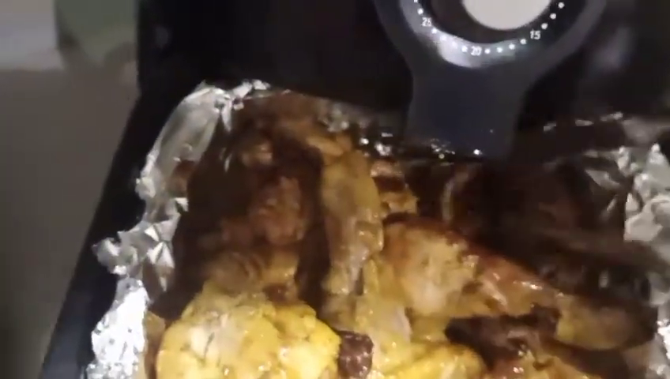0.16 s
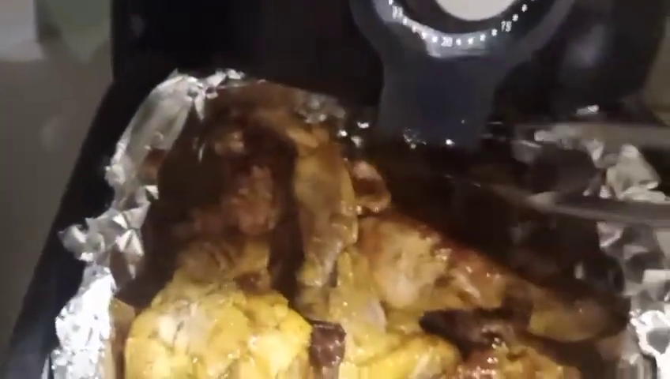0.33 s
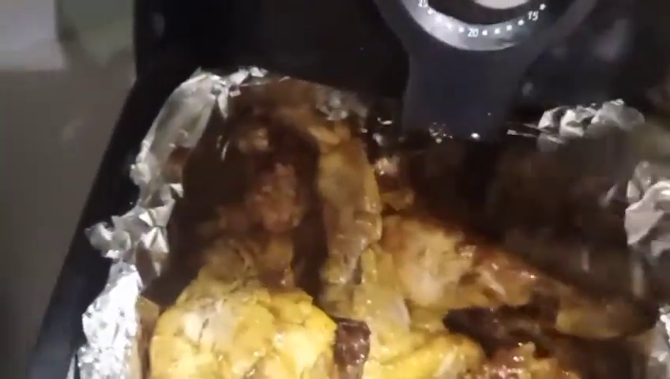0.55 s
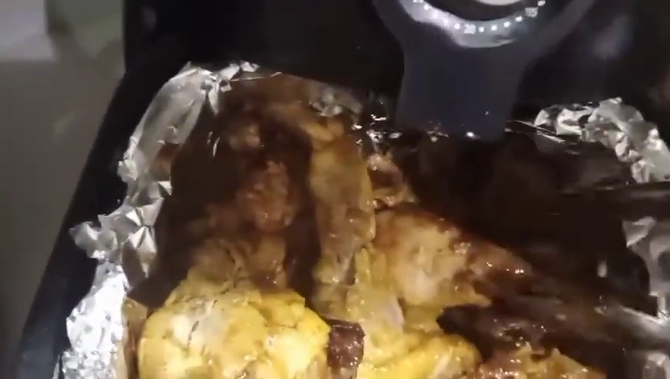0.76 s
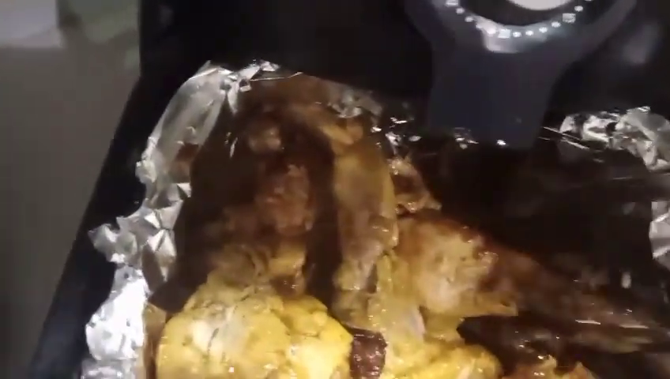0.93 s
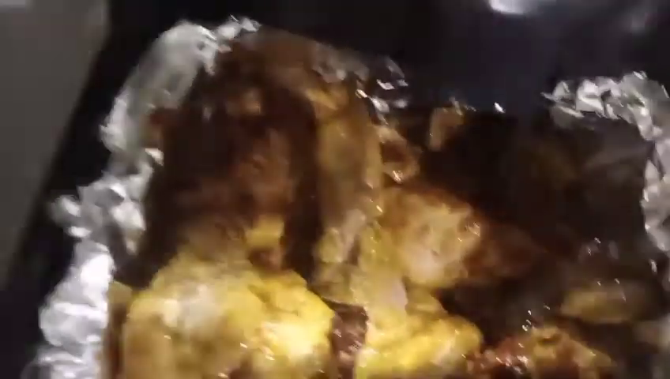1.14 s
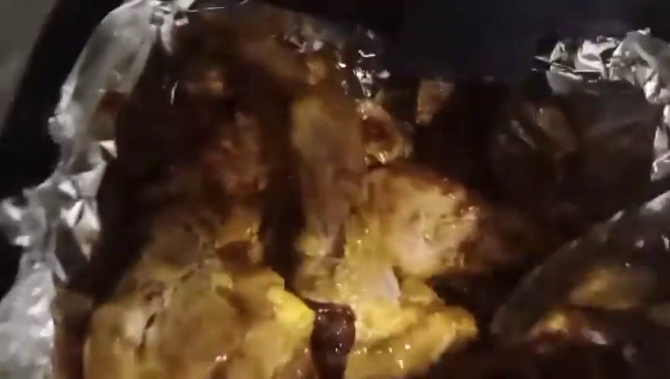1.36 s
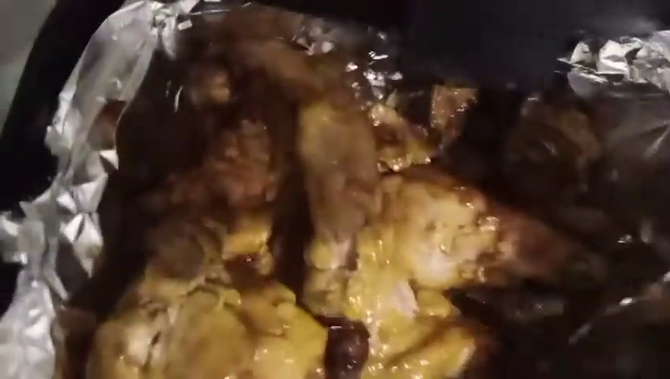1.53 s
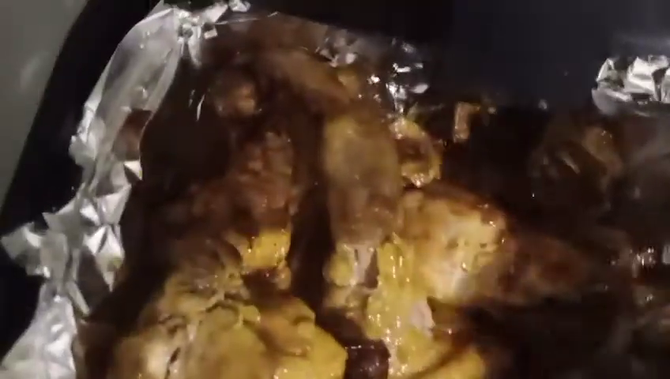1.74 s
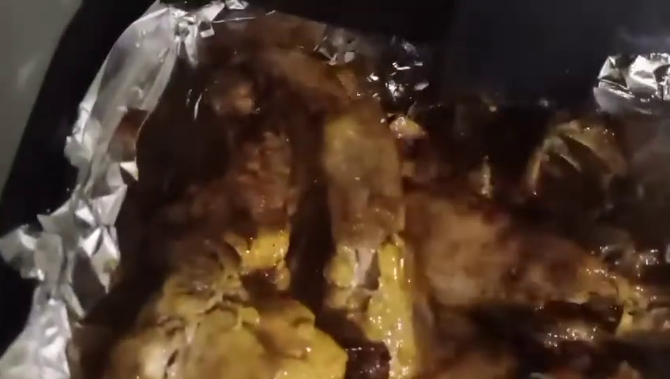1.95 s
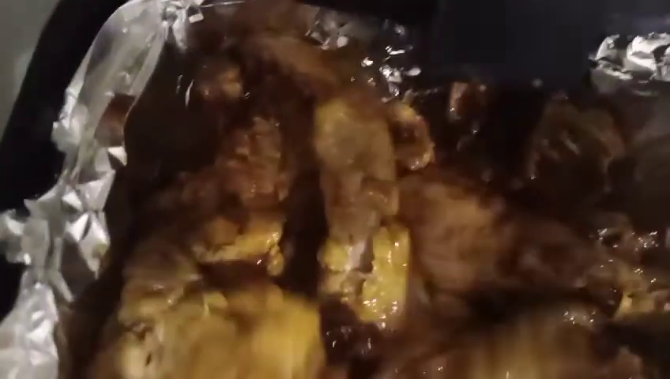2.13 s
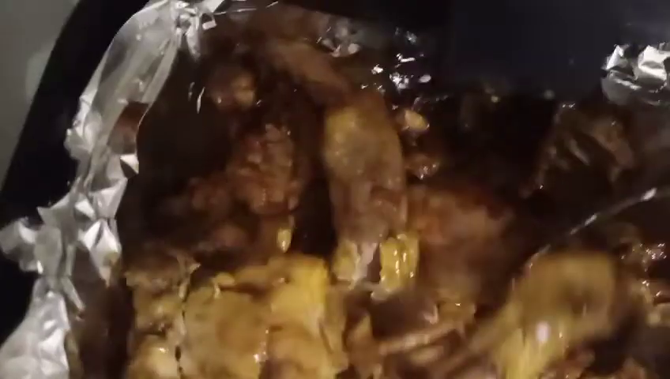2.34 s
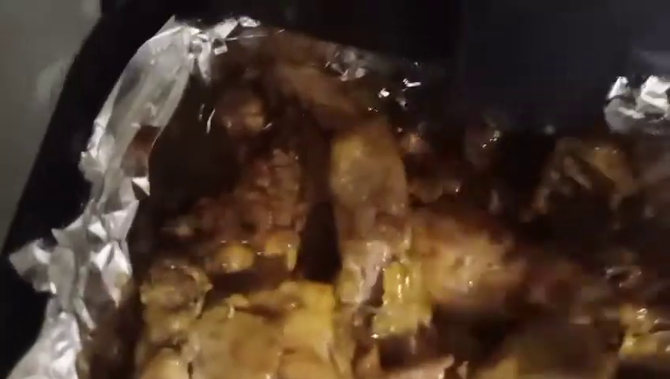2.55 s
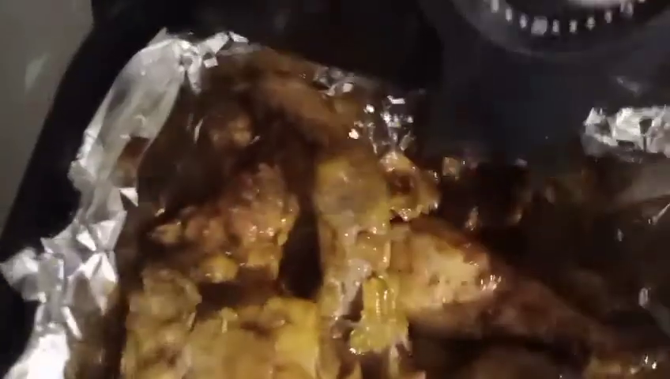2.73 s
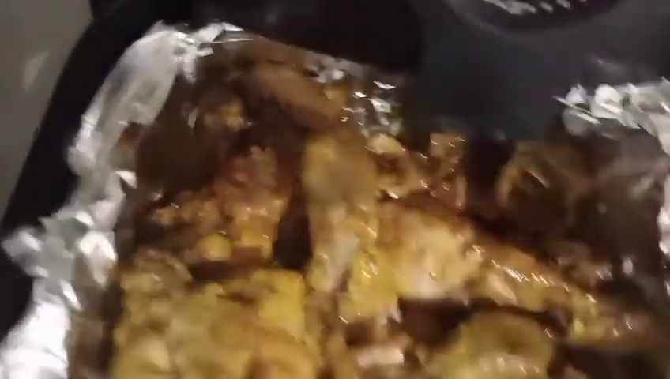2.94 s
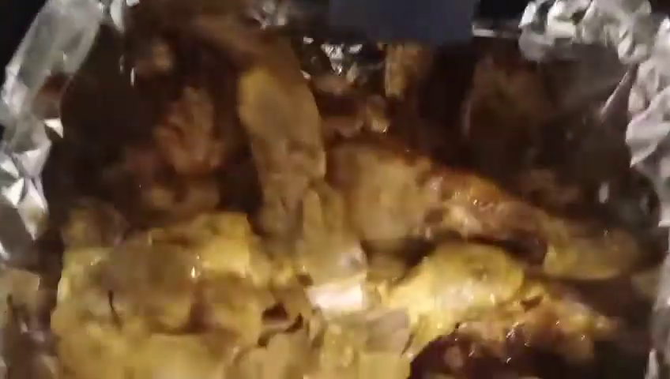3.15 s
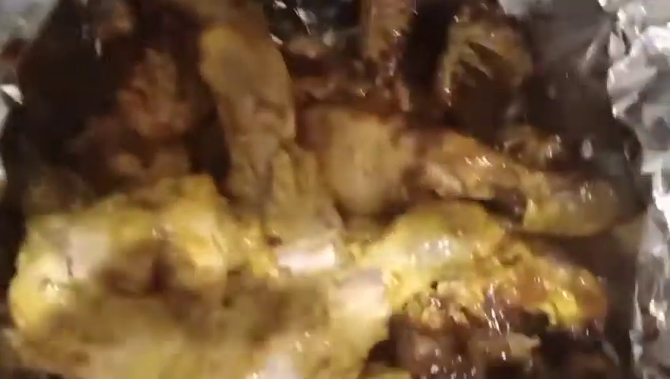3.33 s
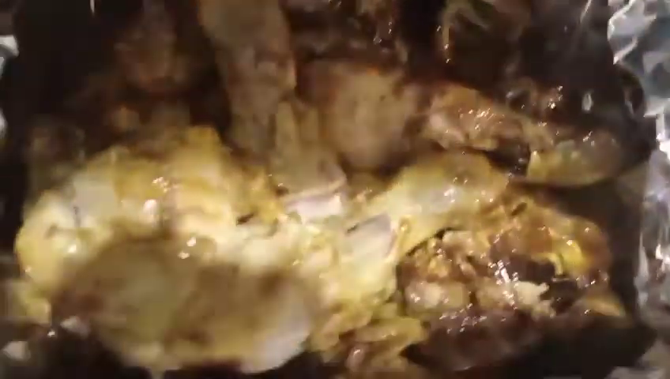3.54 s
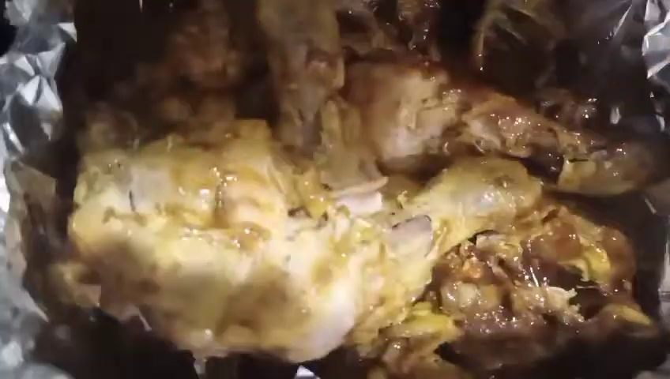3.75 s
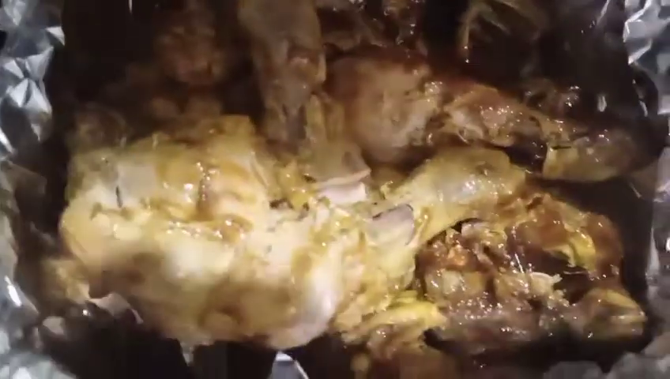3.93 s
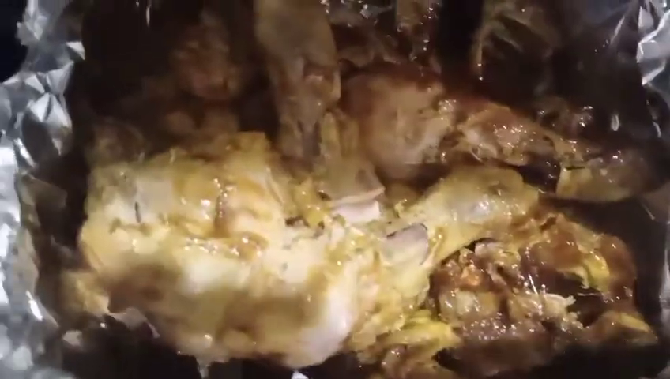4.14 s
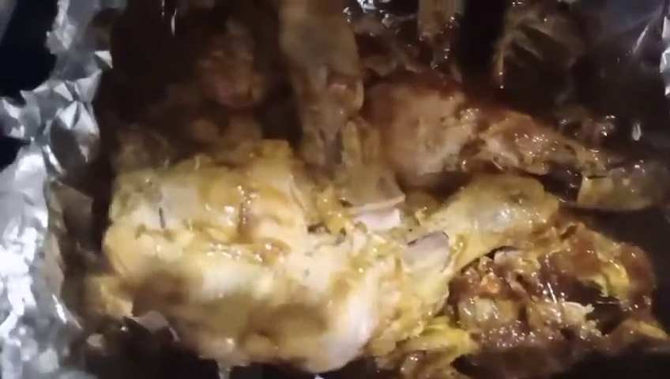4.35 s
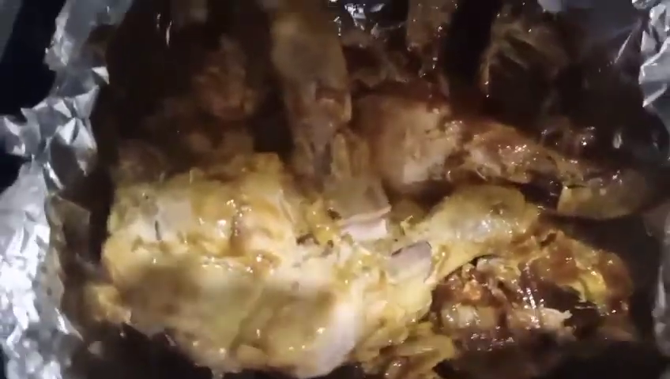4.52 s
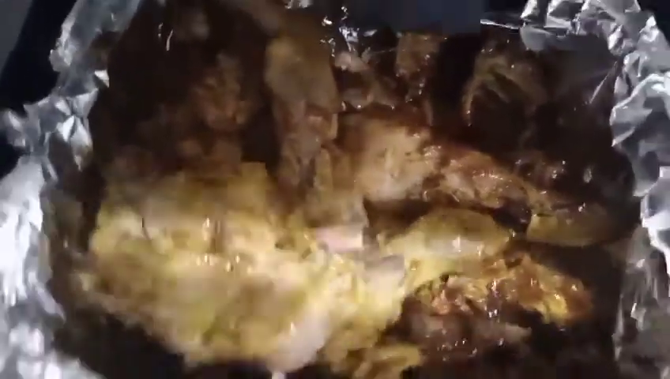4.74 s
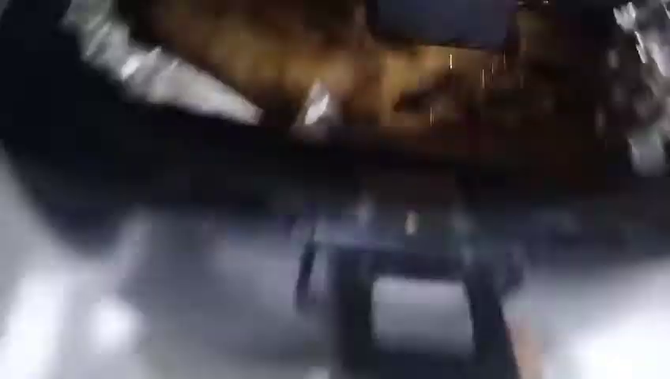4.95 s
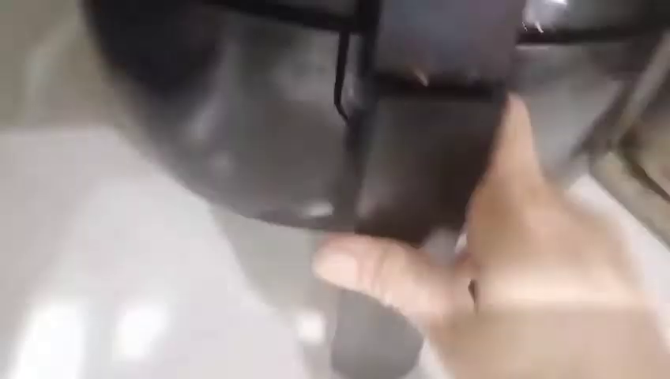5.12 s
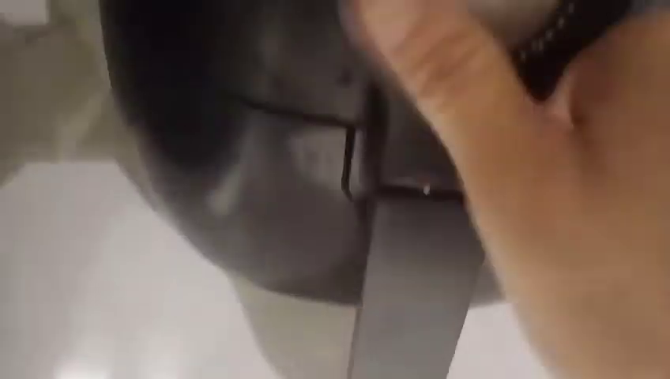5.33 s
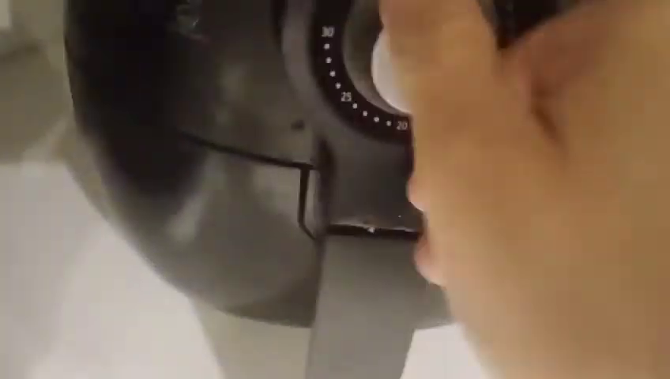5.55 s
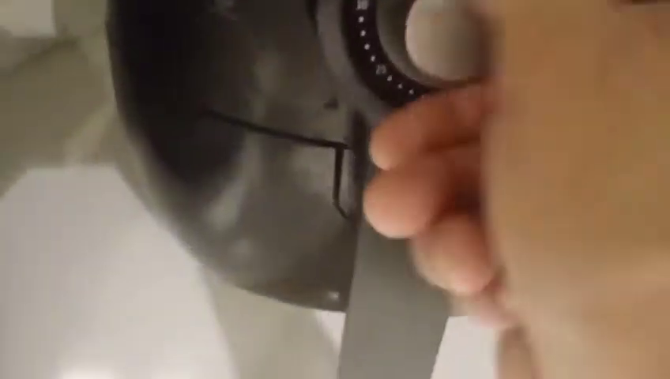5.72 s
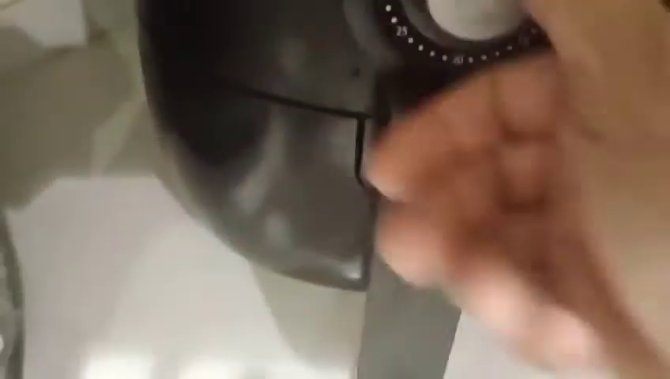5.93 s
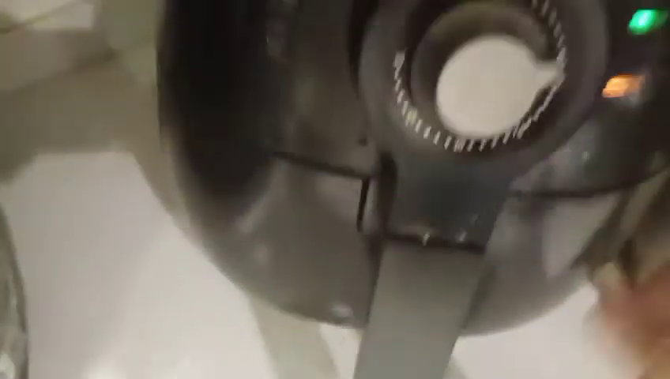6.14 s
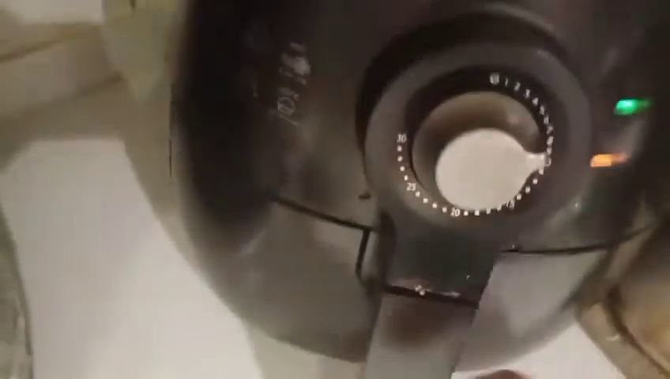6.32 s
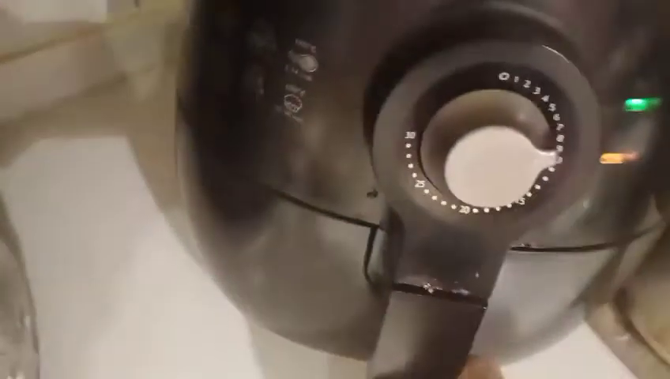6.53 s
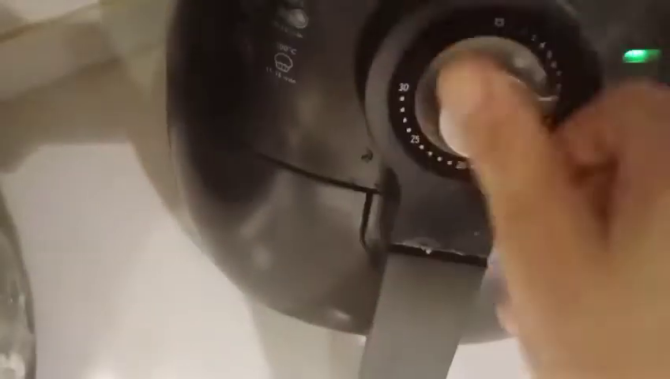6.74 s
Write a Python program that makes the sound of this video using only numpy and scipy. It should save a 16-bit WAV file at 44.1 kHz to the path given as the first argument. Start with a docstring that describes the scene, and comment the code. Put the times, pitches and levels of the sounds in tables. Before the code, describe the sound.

Foil crackles over faintly sizzling chicken, metal tongs click and clatter down, a basket scrapes and thumps shut, a dial ratchets and a fan spins up.

```python
"""Chicken sizzles faintly (bursts of tiny clicks, a jet of hissing noise at first) in an air fryer's basket.
Tongs turn it over the grate and crumple the foil lining: sharp noise cracks and runs of small slips.
The tongs click, then clatter down on the counter, ringing in decaying modes. The basket scrapes, drums and
knocks into its plastic housing and thumps its stop. The timer dial catches and its teeth rattle past.
The fan hums and whines, its throb and rush of air gathering speed; low room noise lies under it all."""
import sys
import numpy as np
from scipy import signal
from scipy.fft import rfft
from scipy.io import wavfile
from scipy.ndimage import uniform_filter1d

SR = 44100
rng = np.random.default_rng(int(sys.argv[2]) if len(sys.argv) > 2 else 0)


def transcribe(signal):
    """Save signal, clipped to [-1, 1], as a 16-bit WAV file at the path in sys.argv[1]."""
    frames = np.atleast_2d(signal).T
    limited = np.clip(frames, -1, 1)
    pcm = np.round(limited * 32767).astype(np.int16)
    wavfile.write(sys.argv[1], SR, pcm)


N = 303408
TIME = np.arange(N) / SR


# In event tables, level is that of the treble; weight is low and mid against treble. foil creases snapping,
# plus one knock of the tongs on the basket at 3.16 s: (time [s], level [dB], weight [dB])
FOIL_SNAPS = [(.0165, -34.5, -34), (.0549, -24.5, -7), (.249, -24, -12.5), (.2941, -18, -7.5),
              (.3319, -26, -7), (.4831, -34, -8), (.8135, -22, -10), (.8193, -34, -19), (.8261, -23.5, -5),
              (.8435, -31, -2), (.8833, -23, -1.5), (.9008, -28.5, -1.5), (.9391, -31.5, -15.5),
              (1.2112, -33, -11.5), (1.215, -25, -31), (1.2604, -20.5, -26.5), (1.4441, -24.5, -15),
              (1.5127, -28.5, -5.5), (1.5395, -31.5, -3), (1.7071, -31.5, -18), (1.7227, -17, -4),
              (1.8792, -23, -5), (2.196, -34, -11), (2.2953, -42, -1), (2.5809, -22, -13),
              (2.5914, -22, -6.5), (2.704, -40.5, -38), (3.1618, -37.5, -1.5), (4.8591, -27, -35)]
# tongs and meat dragging on the foil: (start [s], end [s], level [dB], weight [dB])
FOIL_DRAGS = [(0, .061, -44, -5.5), (.07, .15, -54, -11), (.241, .3, -41.5, -9), (.303, .36, -35, -1.5),
              (.365, .405, -40, -5.5), (.413, .527, -51.5, -6), (.813, .855, -35, -6.5), (.86, .92, -45, 1),
              (.96, 1.03, -47.5, -13.5), (1.21, 1.255, -42, -6), (1.28, 1.363, -50, -10),
              (1.38, 1.44, -45, -10), (1.45, 1.494, -39, -10), (1.525, 1.56, -44.5, -1),
              (1.64, 1.74, -56.5, -6), (1.839, 1.89, -35.5, -6.5), (2.103, 2.135, -45, -51),
              (2.156, 2.365, -54.5, -5), (2.535, 2.562, -42, -12), (2.566, 2.6, -34, -9),
              (2.82, 2.852, -51, -12.5), (3.173, 3.28, -46, -11)]
# resonances of the foil-lined bowl: (frequency [Hz], width [Hz], lift [dB])
BOWL_PEAKS = [(291, 15.4, 18), (463, 78, 11), (873, 30, 3.5), (950, 30, 9.5), (1325, 29, 10),
              (1560, 260, 5.5), (1800, 83, 2.5), (2450, 50, -2), (4030, 270, -2.5), (5370, 39, 1),
              (6840, 440, 0.5)]
# steel skidding on the basket wall: (start [s], end [s], level [dB])
WALL_SKIDS = [(2.437, 2.504, -52.5), (2.504, 2.603, -60), (2.62, 2.685, -76), (4.72, 4.742, -62.5)]
# resonances of the wall: (frequency [Hz], width [Hz], lift [dB])
WALL_PEAKS = [(1140, 260, 20), (1530, 170, 25.5), (2030, 330, 13.5), (2390, 210, 21), (3480, 1700, 12.5)]
SKID_WEIGHT_DB = 19


def foil():
    """Creases snap through; tongs drag across the foil and skid on the wall; it rustles as it settles."""
    snaps = blows(FOIL_SNAPS, BOWL_PEAKS, low_db=-9, air_db=0.0, ripple_db=2.0,
                  rise_s=0.0011, decay_s=0.0037, blunting=0.3, after_db=-25.5, after_s=0.029)
    slips = crinkled(grains(per_s=4100, spread_db=3.3), per_s=70, lift=0.62, decay_s=0.014)
    drags = rubbing(FOIL_DRAGS, BOWL_PEAKS, slips, low_db=-10, air_db=-1.5, ripple_db=5.5,
                    edge_s=.014, release_s=0.011, settle=0.092, settle_s=0.051)
    skid_rows = [(*row, SKID_WEIGHT_DB) for row in WALL_SKIDS]
    skid_slips = grains(per_s=10000, spread_db=-0.5)
    skids = rubbing(skid_rows, WALL_PEAKS, skid_slips, low_db=-27, air_db=7.0, ripple_db=6.5,
                    edge_s=0.016, release_s=0.015)
    return snaps + drags + skids


# tong tips clicking: (time [s], level [dB])
TIP_CLICKS = [(3.0229, -22), (3.097, -32), (3.107, -19.5), (3.125, -31), (3.1418, -22.5), (3.162, -15.5),
              (3.1896, -25.5), (3.2985, -23.5), (3.3183, -21.5), (3.5773, -19), (3.593, -23.5)]
# resonances of the tips: (frequency [Hz], width [Hz], lift [dB])
TIP_PEAKS = [(1470, 100, 20), (3600, 310, 9.7), (4140, 200, 3.5), (5800, 220, 4.1), (6740, 360, 10),
             (8020, 1200, 10), (16000, 200, 3.6)]
# ringing modes of the tips: (frequency [Hz], level [dB], t60 [s])
TIP_MODES = [(1640, -17, 0.093), (2800, -9, 0.37), (3480, -8, 0.53), (3870, 0, 0.044), (4280, -28, 0.11),
             (6520, -4, 0.094), (6680, 10, 0.061), (7200, 6, 0.16), (14860, -23, .08)]
# tongs landing tips first, bouncing, falling flat: (time [s], level [dB], weight [dB])
TONG_BLOWS = [(4.0262, -14.5, -19.5), (4.0302, -16, -14.5), (4.0788, -27.5, -6.5), (4.104, -27.5, -4),
              (4.1448, -24, -1.5), (4.1559, -34, 3.5), (4.1772, -23, -2)]
# resonances of the whole tongs: (frequency [Hz], width [Hz], lift [dB])
TONG_PEAKS = [(660, 86, 13.4), (1100, 280, 14), (1310, 50, 6.9), (1750, 140, 14.3), (2710, 60, 16.6),
              (3670, 83, 13.6), (4630, 37, 11.5), (5800, 75, 11.3), (7180, 110, 13)]
# ringing modes of the whole tongs: (frequency [Hz], level [dB], t60 [s])
TONG_MODES = [(726, -13, 0.34), (1153, -9, 0.37), (1345, -15, 0.32), (1660, -19, .17), (1940, -11.5, 0.31),
              (2720, -20, .17), (3600, 0, 0.31), (4660, 7.5, 0.15), (5530, -11, .13), (5840, 7.5, 0.17),
              (6673, 6.5, .1), (6670, 1, 0.084), (8660, -2, 0.13), (10400, -16, .16), (12700, -8, 0.15),
              (13440, -20, 0.18), (13980, -15, 0.18)]
TIP_WEIGHT_DB = -30.5


def tongs():
    """Bright clicks of the tips, then the whole tool lands and bounces, its steel modes ringing."""
    tip_rows = [(*row, TIP_WEIGHT_DB) for row in TIP_CLICKS]
    tips = blows(tip_rows, TIP_PEAKS, low_db=-15, air_db=8.5, ripple_db=5.0,
                 rise_s=0.00037, decay_s=0.0047, blunting=0.29, after_db=-29, after_s=0.048,
                 modes=TIP_MODES, ring_db=-11, detune=0.0033)
    landing = blows(TONG_BLOWS, TONG_PEAKS, low_db=-12.5, air_db=-1.5, ripple_db=4.5,
                    rise_s=0.0017, decay_s=.0095, blunting=0.47, after_db=-23.5, after_s=0.031,
                    modes=TONG_MODES, ring_db=-9.0, detune=0.0017)
    return tips + landing


# basket bumping along and seating home: (time [s], level [dB], weight [dB])
BASKET_BLOWS = [(4.8976, -32.5, -10), (4.9088, -31.5, -4), (4.9589, -37, 18.5), (4.9806, -35.5, 13),
                (4.9856, -41.5, 15.5), (5.0675, -27, -1.5), (5.0792, -18.5, -1.5), (5.1129, -27.5, -8),
                (5.1258, -24.5, -1), (5.1973, -28.5, 2), (5.2099, -32, 12.5), (5.224, -29, -1.5)]
# shoves along the runners: (start [s], end [s], scraping level [dB], drumming level [dB])
SHOVES = [(4.786, 4.88, -49.5, -50), (4.908, 4.96, -43, -36), (4.984, 5.06, -35, -30),
          (5.069, 5.152, -41, -28), (5.154, 5.18, -35, -39)]
# resonances of the housing: (frequency [Hz], width [Hz], lift [dB])
HOUSING_PEAKS = [(193, 25, 5.7), (269, 38, 12.3), (455, 19, 13), (684, 18, 9.7), (772, 58, 11.3),
                 (1330, 230, 6.3), (1830, 9.9, 1.8), (3420, 200, 2.7)]
# ringing modes of the housing: (frequency [Hz], level [dB], t60 [s])
HOUSING_MODES = [(92, 9, 0.2), (180.6, -8, 0.49), (224, -7, 0.17), (277.5, 8, 0.33), (452, 5, 0.16),
                 (664, -12.5, .16), (830, -4, 0.138), (1036, 5.5, 0.24), (1300, -19, 0.24)]
# thump modes of the whole cabinet: (frequency [Hz], level [dB], t60 [s])
CABINET_MODES = [(136, -3, .08), (180, -0.5, 0.18), (215, 0, 0.095), (296, -3, 0.11)]
RUNNER_WEIGHT_DB = -5
STOP_S, STOP_DB = 5.229, -16.5


def basket():
    """Scrapes and drums along its runners, knocks the hollow housing and thumps the cabinet at its stop."""
    knocks = blows(BASKET_BLOWS, HOUSING_PEAKS, low_db=2.5, air_db=-2.0, ripple_db=1.5,
                   rise_s=0.00048, decay_s=0.0073, blunting=0.035, after_db=-29, after_s=0.039,
                   modes=HOUSING_MODES, ring_db=-17, detune=0.016)
    scrape_rows = [(start, end, db, RUNNER_WEIGHT_DB) for start, end, db, _ in SHOVES]
    slips = grains(per_s=2500, spread_db=-0.5)
    scrapes = rubbing(scrape_rows, HOUSING_PEAKS, slips, low_db=-2.5, air_db=2.0, ripple_db=7.0,
                      edge_s=0.011, release_s=0.026)
    push = sum(amp(db) * envelope(TIME, start, end, attack_s=0.017, release_s=0.012)
               for start, end, _, db in SHOVES)
    drumming = push * tone(hz=88.5, waver=0.041, waver_hz=25.)
    out = knocks + scrapes + drumming
    add(out, STOP_S, amp(STOP_DB) * ring(CABINET_MODES, detune=0))
    return out


# jolts to the hollow shell: (time [s], level [dB])
JOLTS = [(3.155, -64), (4.1, -46), (4.16, -47.5), (5.08, -50), (5.228, -27), (5.491, -47.5), (5.6, -53.5),
         (6.52, -45.5)]
# resonances of the shell: (frequency [Hz], width [Hz], lift [dB])
SHELL_PEAKS = [(99, 100, 25.5), (179, 12, 7), (313, 19, 19), (443, 36, 2)]
BOOM_RISE_S, BOOM_DECAY_S = 0.014, 0.05


def shell():
    """Each jolt sets the hollow shell booming for a moment."""
    spectrum = [(30, -13), (80, 9), (450, -0.5), (1000, -26), (3000, -54.5)]
    boom = coloured(rng.standard_normal(N), spectrum, peaks=SHELL_PEAKS)
    swell = sum(amp(db) * envelope(TIME, s, s + BOOM_RISE_S, BOOM_RISE_S, BOOM_DECAY_S) for s, db in JOLTS)
    return boom * swell


# timer catching and clicking: (time [s], level [dB], weight [dB])
DIAL_CLICKS = [(5.763, -20, -8.5), (5.8548, -33, 1), (5.8834, -38, -1), (5.9635, -33.5, -1.5)]
# dial being wound: (start [s], end [s], level [dB], weight [dB])
WINDING = [(5.775, 5.935, -44.5, -2.5)]
# resonances of the dial: (frequency [Hz], width [Hz], lift [dB])
DIAL_PEAKS = [(910, 67, 20.6), (1300, 120, 18.7), (1520, 82, 12.3), (4160, 27, 2.3), (4640, 75, 12.4),
              (5500, 340, 7.8), (8040, 86, 11), (9700, 89, 24), (14360, 310, 21.8)]


def timer(teeth_hz=97.2):
    """The dial catches, then its gear teeth rattle past as it is wound, each a burst of dying grains."""
    tooth_phase = TIME * teeth_hz % 1
    teeth = grains(per_s=6000, spread_db=-1.5) * (.5 + np.exp(-tooth_phase / 0.41))
    whirr = rubbing(WINDING, DIAL_PEAKS, teeth, low_db=-8.5, air_db=-10.0, ripple_db=4.5,
                    edge_s=0.012, release_s=0.0027)
    clicks = blows(DIAL_CLICKS, DIAL_PEAKS, low_db=-25, air_db=-5.5, ripple_db=6.0,
                   rise_s=.0004, decay_s=0.0051, blunting=0.23, after_db=-48, after_s=.03)
    return whirr + clicks


# magnetic hum of the motor: (frequency [Hz], rms level [dB])
HUM = [(119.7, -58), (239.4, -61)]
# rotor gathering speed: (time [s], frequency [Hz])
ROTOR = [(5.8, 62), (6.3, 92.4), (6.55, 119.8), (6.7, 147.7), (6.88, 168.5)]
# spectrum of the moving air: (frequency [Hz], gain [dB])
DRAUGHT = [(30, -31), (70, -13), (110, 3.5), (165, 7), (260, -0.5), (340, -18), (800, -32.5), (3000, -34)]
RUSH_DB, RUSH_POWER = -47, 2.1  # air level at full speed; exponent of its growth with speed


def fan(on_s=5.83, swell_s=0.02, whine_db=-66.0, throb_db=-4.5):
    """The motor hums at once and briefly whines; rotor throb and rush of air grow as a power of speed."""
    on = np.clip((TIME - on_s) / swell_s, 0, 1)
    speed_hz = np.interp(TIME, *np.transpose(ROTOR))
    hum = sum(amp(db) * np.sqrt(2) * np.sin(2 * np.pi * hz * TIME) for hz, db in HUM)
    whine = tone(hz=609.0, waver=0.011, waver_hz=12.0)
    whine += amp(-5.5) * band(rng.standard_normal(N), 650, 766)
    whine *= amp(whine_db) * envelope(TIME, start_s=5.91, end_s=6.41, attack_s=0.076, release_s=0.037)
    air_peaks = [(267, 71, 2.5), (1340, 72, 29.6), (2600, 200, 24)]
    air = patchy(coloured(rng.standard_normal(N), DRAUGHT, peaks=air_peaks), depth_db=2.5)
    throb = amp(throb_db) * tone(hz=speed_hz, waver=0.091, waver_hz=30.1)
    rush = amp(RUSH_DB) * (speed_hz / speed_hz.max()) ** RUSH_POWER * (air + throb)
    return on * (hum + rush) + whine


# meat rolling over on the grate: (start [s], end [s], level [dB])
ROLLS = [(0.056, 0.147, -60), (1.288, 1.372, -52.5), (1.483, 1.556, -50), (1.61, 1.689, -51),
         (1.71, 1.894, -49), (1.902, 2.026, -63.5)]
# resonances of the grate: (frequency [Hz], width [Hz], lift [dB])
GRATE_PEAKS = [(107, 34, 6.5), (311, 17, 26.5), (463, 53, 19), (680, 110, 14), (1060, 43, 5)]


def meat():
    """Pieces roll over the grate: resonant noise whose narrow bands flicker as contacts change."""
    spectrum = [(30, -19), (90, 0.5), (900, -17.0), (1400, -4), (4000, -37)]
    roll = coloured(rng.standard_normal(N), spectrum, peaks=GRATE_PEAKS)
    roll = patchy(roll, depth_db=4.)
    return roll * sum(amp(db) * envelope(TIME, start, end, attack_s=0.01, release_s=0.017)
                      for start, end, db in ROLLS)


# hot fat, livelier at first: (time [s], level [dB])
SIZZLE_LEVEL = [(0, -45.5), (.5, -48), (1.1, -50.5), (2.9, -51), (3.4, -49.5), (6.9, -49.5)]
# spectrum of bursting fat: (frequency [Hz], gain [dB])
FAT = [(300, -34.5), (1300, -18), (2300, -17.5), (3000, -6), (3700, 0), (5000, -0.5), (7000, 1.5),
       (16000, 3)]
# whistling of the steam jet: (frequency [Hz], width [Hz], lift [dB])
JET_PEAKS = [(6060, 90, 26), (6700, 200, 21), (7030, 370, 25.5)]


def sizzle(jet_db=-43.5):
    """Thousands of tiny bubbles burst in the fat; at first a thin jet of steam swells and runs out."""
    fat = coloured(grains(per_s=9000, spread_db=-2.2), FAT, MICROPHONE)
    fat = patchy(fat, depth_db=4.)
    jet_spectrum = [(2000, -14), (5500, -3), (16000, 19.5)]
    jet = coloured(rng.standard_normal(N), jet_spectrum, MICROPHONE, peaks=JET_PEAKS)
    jet_swell = envelope(TIME, start_s=-0.46, end_s=0.7, attack_s=1.0, release_s=0.16)
    return fat * level(SIZZLE_LEVEL) + amp(jet_db) * jet * jet_swell


# spectrum of the room noise: (frequency [Hz], gain [dB])
KITCHEN = [(20, -28), (55, 8.5), (90, 5), (170, -12), (290, 3.5), (360, -21), (1000, -25), (4000, -37)]
KITCHEN_DB = -68.5


def kitchen():
    """Steady, mostly low noise of the small kitchen."""
    return amp(KITCHEN_DB) * coloured(rng.standard_normal(N), KITCHEN)


def blows(rows, body, low_db, air_db, ripple_db, rise_s, decay_s, blunting, after_db, after_s,
          modes=None, ring_db=0, detune=0):
    """Cracks of fast-dying noise with a weak after-rattle, plus modes; softer blows last longer (blunting)."""
    out, t = np.zeros(N), np.arange(SR // 5) / SR
    hardest = max(db for _, db, _ in rows)
    for s, db, weight_db in rows:
        gains = shares(db, weight_db, low_db)
        decay = decay_s * amp(hardest - db) ** blunting
        shape = np.exp(-t / decay) + amp(after_db) * np.exp(-t / after_s)
        shape *= 1 - np.exp(-t / rise_s)
        crack = registers(rng.standard_normal(len(t)), body, air_db, ripple_db) * shape
        crack *= np.linalg.norm(shape) / np.linalg.norm(crack, axis=1, keepdims=True)
        add(out, s, gains @ crack)
        if modes:  # the harder the blow, the louder the ring
            add(out, s, amp(ring_db) * np.linalg.norm(gains) * ring(modes, detune))
    return out


def ring(modes, detune):
    """One blow on a set of decaying modes; each blow shares its force out a little differently."""
    hz, db, t60 = np.transpose(modes)[:, :, None]
    t = np.arange(SR // 2) / SR
    share, shift, side = rng.standard_normal((3, len(modes), 1))
    size = amp(db + share)
    waves = np.sign(side) * np.sin(2 * np.pi * hz * (1 + detune * shift) * t) * amp(-60 * t / t60)
    onset = 1 - np.exp(-t / .001)
    return onset * (size * waves).sum(0) / np.sqrt((size ** 2).sum() / 2)


def rubbing(rows, body, slips, low_db, air_db, ripple_db, edge_s, release_s, settle=0, settle_s=1):
    """Each stroke is a run of tiny slips that swells quickly and dies away; the share settle lingers."""
    out, t = np.zeros(N), np.arange(SR // 2) / SR
    for start, end, db, weight_db in rows:
        stroke = envelope(t, 0, end - start, edge_s, release_s)
        lingering = envelope(t, 0, end - start, edge_s, settle_s)
        shape = (1 - settle) * stroke + settle * lingering
        run = slips[max(round(start * SR), 0):][:len(t)]
        rub = shares(db, weight_db, low_db) @ registers(run, body, air_db, ripple_db)
        add(out, start - edge_s / 2, shape * rub)
    return out


# registers of a blow or stroke: (frequency [Hz], gain [dB])
LOW = [(40, -19), (110, -9), (220, -4.5), (500, 1.5), (900, -6), (2000, -28.5), (8000, -72)]
MID = [(100, -53), (400, -52), (650, -0.5), (950, -2), (2400, 1.5), (3500, -5), (6000, -10), (9000, -30)]
TREBLE = [(300, -76), (1200, -56), (2200, -14.5), (3100, -4.5), (7800, 0.5)]
# response of the microphone: (frequency [Hz], gain [dB])
MICROPHONE = [(20, 10), (7500, 1), (8300, -11.5), (9300, -20.5), (11500, -20), (13000, -12), (15000, -8.5),
              (16000, -24)]


def registers(x, body, air_db, ripple_db):
    """An excitation heard through a body, in low, mid and treble; air_db sets the gain from 10 kHz up."""
    shapes = LOW, MID, TREBLE + [(10000, air_db)]
    return np.array([coloured(x, shape, MICROPHONE, peaks=body, ripple_db=ripple_db) for shape in shapes])


def shares(db, weight_db, low_db):
    """Gains of low, mid and treble: weight lifts the lower two; low_db sets bass against mid."""
    return amp([db + weight_db + low_db, db + weight_db, db])


def grains(per_s, spread_db):
    """A random train of tiny clicks, their sizes scattered by spread_db; rms 1."""
    size = amp(spread_db * np.minimum(rng.exponential(1, N), 4.5))
    return evened(size * rng.standard_normal(N) * (rng.random(N) < per_s / SR))


def crinkled(slips, per_s, lift, decay_s):
    """Small creases give way at random, each a brief flurry of slips."""
    kicks = np.minimum(rng.exponential(1, N), 2) * (rng.random(N) < per_s / SR)
    flurries = signal.lfilter([1], [1, -np.exp(-1 / (decay_s * SR))], kicks)
    return evened(slips * (1 + lift * flurries))


def tone(hz, waver, waver_hz):
    """A sine of rms 1 whose pitch wanders by the share waver."""
    wander = band(rng.standard_normal(N), 0.67, waver_hz, order=1)
    return np.sqrt(2) * np.sin(2 * np.pi * np.cumsum(hz * (1 + waver * wander)) / SR)


def patchy(x, depth_db):
    """Makes narrow patches of a noise flicker, less so above 2.5 kHz; rms 1."""
    hz, _, z = signal.stft(x, nperseg=1024, noverlap=768, fs=SR)
    patches = uniform_filter1d(rng.standard_normal(z.shape), size=4, axis=0)
    patches = evened(uniform_filter1d(patches, size=12, axis=1))
    depth = depth_db * np.interp(hz, [2500, 5000], [1, .35])[:, None]
    return evened(signal.istft(z * amp(depth * patches), nperseg=1024, noverlap=768)[1][:N])


def coloured(x, *spectra, peaks=(), ripple_db=0):
    """Passes x through spectra of (Hz, dB), resonances and the ripple of close reflections; rms 1."""
    hz = np.fft.rfftfreq(len(x), 1 / SR)
    db = 0
    for spectrum in spectra:
        point_hz, point_db = np.transpose(spectrum)
        db = db + np.interp(np.log(hz + 1), np.log(point_hz), point_db)
    if ripple_db:
        delay_s, turn = rng.uniform(0, .005, (8, 1)), rng.random((8, 1))
        db = db + ripple_db * np.cos(2 * np.pi * (hz * delay_s + turn)).sum(0) / 2
    return evened(np.fft.irfft(rfft(x) * amp(db) * resonances(hz, peaks), len(x)))


def resonances(hz, peaks):
    """Gain of a flat response lifted by peaks of (Hz, width Hz, dB)."""
    return np.sqrt(1 + sum(amp(db) ** 2 / (1 + (2 * (hz - f) / width) ** 2) for f, width, db in peaks))


def band(x, lo_hz, hi_hz, order=2):
    """Band-pass; rms 1."""
    return evened(signal.sosfilt(signal.butter(order, [lo_hz, hi_hz], "band", fs=SR, output="sos"), x))


def envelope(t, start_s, end_s, attack_s, release_s):
    """Rises from start_s over attack_s; dies away after end_s."""
    return np.clip((t - start_s) / attack_s, 0, 1) * np.exp(-np.maximum(t - end_s, 0) / release_s)


def level(curve):
    """Gain along a curve of (s, dB), silent outside it."""
    return amp(np.interp(TIME, *np.transpose(curve), left=-120, right=-120))


def amp(db):
    """Decibels to gain."""
    return 10 ** (np.asarray(db) / 20)


def evened(x):
    """Scales to rms 1."""
    return x / np.sqrt(np.mean(x ** 2) + 1e-20)


def add(mix, s, sound):
    """Mixes a sound in at time s."""
    part = mix[max(round(s * SR), 0):][:len(sound)]
    part += sound[:len(part)]


def room(x, t60_low=0.37, t60_high=0.3):
    """Scattered echoes from tiles and cupboards, dying away in two bands split at 2.5 kHz."""
    t = np.arange(SR // 2) / SR
    taps = rng.standard_normal(len(t)) * (rng.random(len(t)) < 3000 / SR) * (t > .006)
    low = signal.sosfilt(signal.butter(2, 2500, fs=SR, output="sos"), taps)
    high = signal.sosfilt(signal.butter(2, 2500, "high", fs=SR, output="sos"), taps)
    tail = low * amp(-60 * t / t60_low) - high * amp(-60 * t / t60_high)
    return signal.fftconvolve(x, tail / np.linalg.norm(tail))[:N]


def scene():
    """Foil and meat are near and almost dry; tongs, basket, shell and timer fill the kitchen more."""
    near = foil() + meat()
    far = tongs() + basket() + shell() + timer()
    background = kitchen()
    echoes = room(amp(-32.5) * near + amp(-12.0) * far)
    return (near + far + echoes + sizzle() + fan() + background)[None]


EDGE_HZ = 15650


def record(dry):
    """The recorder's band limit: a linear-phase low-pass."""
    lowpass = signal.firwin(401, EDGE_HZ, window=("kaiser", 8), fs=SR)
    return signal.oaconvolve(dry, lowpass[None], "same")


dry = scene()
out = record(dry)
transcribe(out)
```